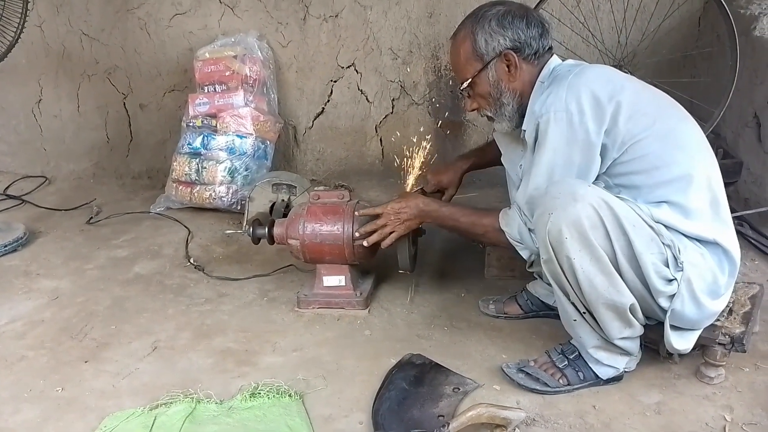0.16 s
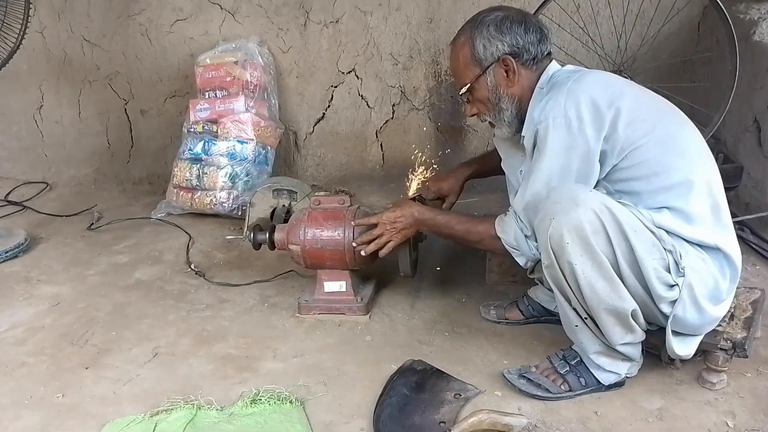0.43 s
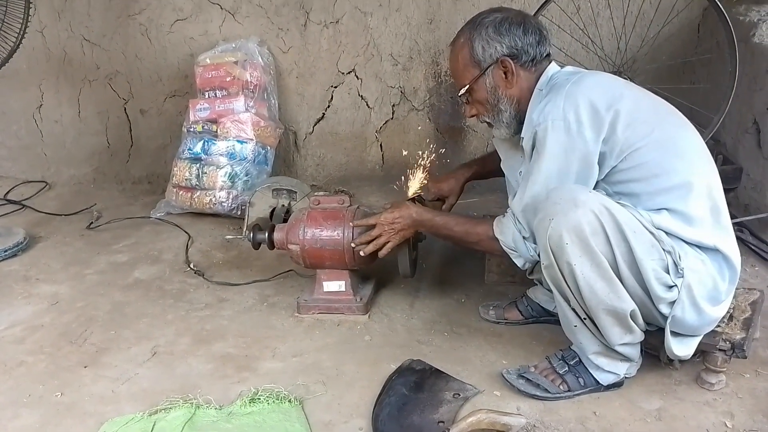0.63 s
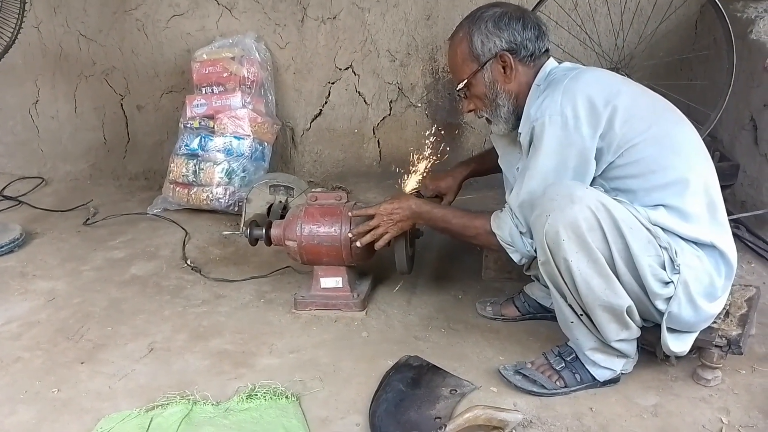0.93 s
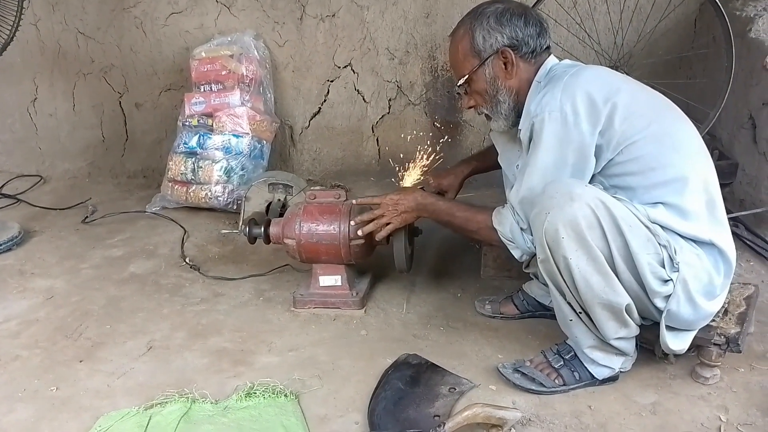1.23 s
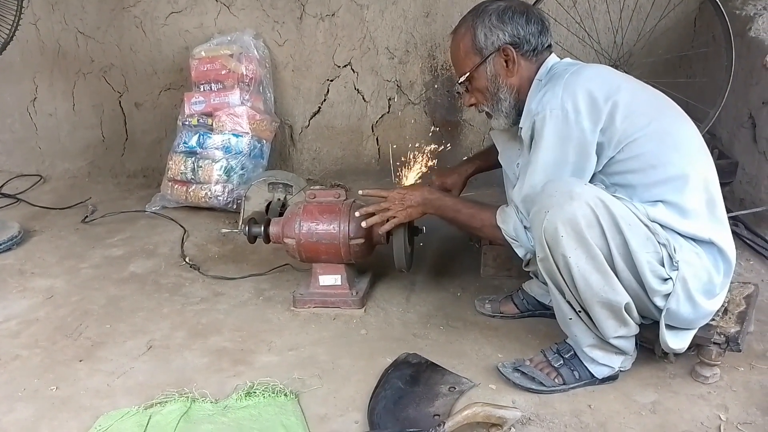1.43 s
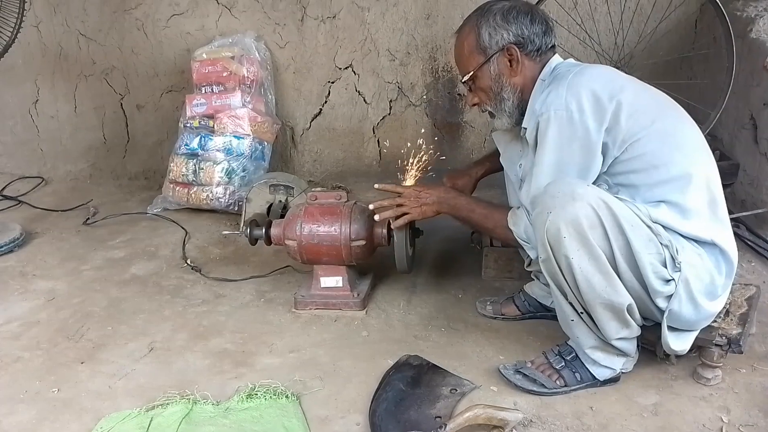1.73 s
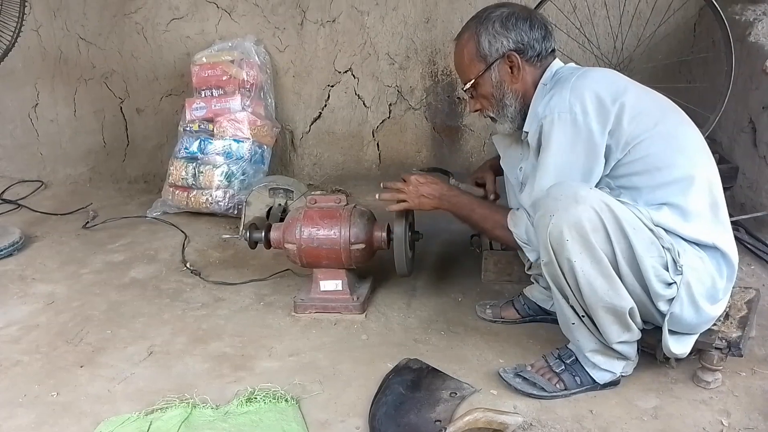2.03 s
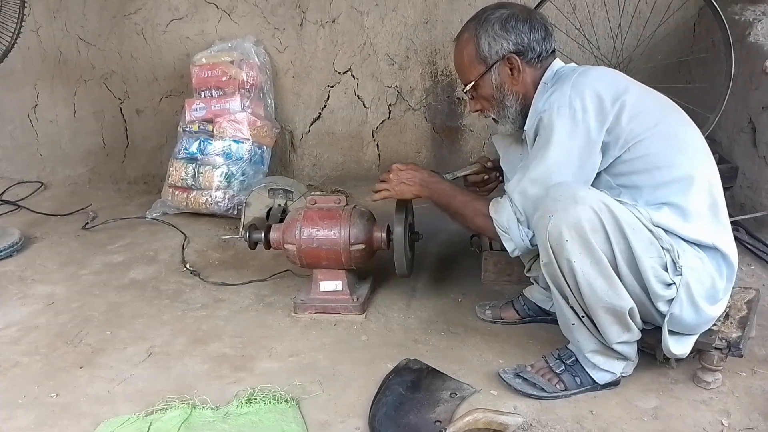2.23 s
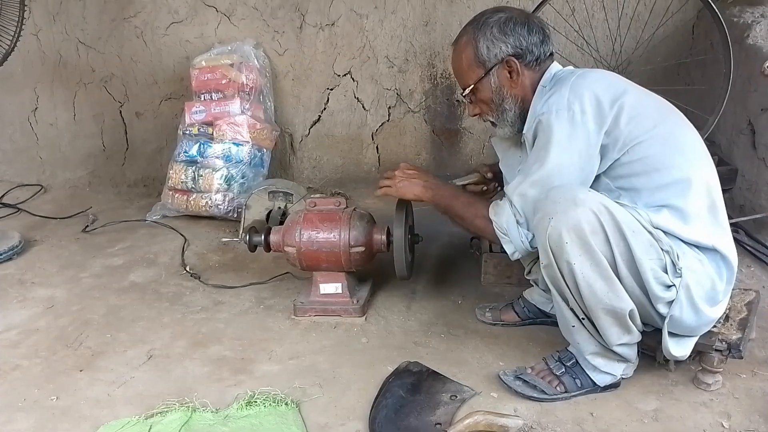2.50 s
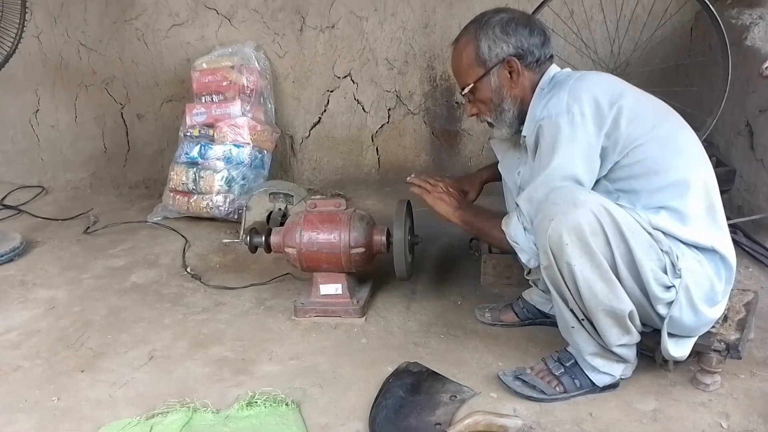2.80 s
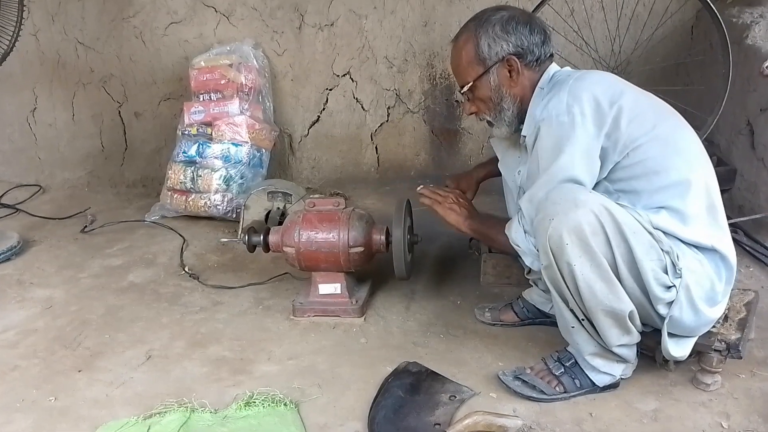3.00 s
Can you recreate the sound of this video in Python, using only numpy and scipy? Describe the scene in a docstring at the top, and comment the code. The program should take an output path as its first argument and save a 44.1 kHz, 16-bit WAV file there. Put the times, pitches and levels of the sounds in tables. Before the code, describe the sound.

Loud gritty metal-on-wheel rasp with fluttering wheel-speed buzz and hissy ringing, then an abrupt lift, a short reverberant tail and quiet low humming of the grinder in an open yard; mono, treble cut at the top.

```python
"""Blade on a bench grinder

A steel blade is drawn across the wheel of a bench grinder in an open workshop, then lifted off.
Grit under the edge comes round every turn, so the rasp buzzes at wheel speed; it changes as the blade
slides to fresh grit, and its colour and ringing modes, made by filters, change from hold to hold.
The walls answer with decaying noise. Motor hum, yard noise and faint late tones are filtered noise."""
import sys
import numpy as np
from scipy import signal
from scipy.fft import rfft, irfft, next_fast_len
from scipy.io import wavfile
from scipy.ndimage import uniform_filter1d, map_coordinates

SR = 44100
rng = np.random.default_rng(int(sys.argv[2]) if len(sys.argv) > 2 else 0)


def rack_gain(trim_db):
    """Turn a fader trim in dB into the linear factor to multiply a signal by."""
    fader = np.asarray(trim_db, float)
    return 10 ** (fader / 20)


def persist_wave(psi):
    """Save psi, clipped to +-1, as 16-bit WAV."""
    counts = np.round(np.clip(psi, -1, 1) * 32767).astype(np.int16)
    wavfile.write(sys.argv[1], SR, np.atleast_2d(counts).T)


N = 138915  # samples

# wheel under load: (time [s], speed [turns/s], slide across the grit [tracks/s])
WHEEL_MOTION = [(0, 48.51, 11.7), (.2, 48.51, 5.5), (.38, 48.5, 9.8), (.55, 48.39, 5), (.8, 48.2, 6.14),
                (1, 48.11, 4.9), (1.15, 48.09, 6.27), (1.28, 48.08, 10.7), (1.42, 48.13, 4.3),
                (1.55, 48.14, 20), (1.7, 48.24, 25.7), (1.9, 48.3, 35.6), (2.2, 49.3, 36)]


def unit(x):
    """Scale to rms 1."""
    return x / np.sqrt(np.mean(x ** 2) + 1e-20)


def along(points, hz):
    """Read (frequency [Hz], value) points on a log frequency axis."""
    f, v = np.transpose(points)
    return np.interp(np.log(hz + 1), np.log(f + 1), v)


def curves(rows):
    """One value per sample for each column after the time."""
    s, *cols = np.transpose(rows)
    return [np.interp(np.arange(N) / SR, s, c) for c in cols]


def causal(x, gain):
    """Pass x through the minimum-phase filter with this gain, by folding the cepstrum."""
    m = 2 * next_fast_len(N // 2 + 8192)
    hz = np.fft.rfftfreq(m, 1 / SR)
    cepstrum = irfft(np.log(gain(hz) + 1e-6), m)
    folded = np.concatenate([cepstrum[:1], 2 * cepstrum[1:m // 2], np.zeros(m // 2)])
    return irfft(rfft(x, m) * np.exp(rfft(folded)), m)[:N]


def peak(hz, centre_hz, width_hz):
    """Gain of one resonance: 1 at its centre, half at the edges of its width."""
    return 1 / (1 + (2 * (hz - centre_hz) / width_hz) ** 2)


def patchy(x, depth_db, tall, long):
    """Give x patches of random gain, smoothed over tall bins by long frames; depth is per sample."""
    _, at, z = signal.stft(x, nperseg=512)
    field = rng.standard_normal(z.shape)
    for _ in range(2):
        field = uniform_filter1d(field, size=tall, axis=0)
        field = uniform_filter1d(field, size=long, axis=1)
    gain_db = np.interp(at, np.arange(N), depth_db) * unit(field)
    return signal.istft(z * rack_gain(gain_db), nperseg=512)[1][:N]


def grit():
    """Rings of uneven grains, read by the edge at wheel speed as it slides from ring to ring."""
    # out-of-round face: (bumps per turn, height [dB], phase [rad])
    high_spots = [(1, 1.4, 1.2), (2, 1.3, 3.2), (4, .9, -2.2)]
    tracks, grains, fine = 96, 800, 8000  # rings; grains and finer reading points round each ring
    lump_db, grain_db = 1, 2.5  # unevenness of each ring (rms), scale of the spread of grain sizes
    loose = 0.46  # amplitude share of loose grit, which does not repeat
    turns, slide = curves(WHEEL_MOTION)

    lumps = rng.standard_normal((tracks, grains))
    lumps = unit(uniform_filter1d(lumps, size=60, axis=1, mode="wrap"))
    sizes = rack_gain(lump_db * lumps + grain_db * rng.uniform(-2, 1.9, (tracks, grains)))
    face = unit(irfft(rfft(sizes * rng.standard_normal((tracks, grains))), fine))

    angle = np.cumsum(turns) / SR % 1 * fine
    track = np.cumsum(slide) / SR
    ring = track.astype(int)
    part = track % 1 * np.pi / 2  # equal-power crossing to the next ring

    def read(r):
        return map_coordinates(face, [r % tracks, angle], order=1, mode="grid-wrap")

    fixed_grit = np.cos(part) * read(ring) + np.sin(part) * read(ring + 1)
    mixed = np.sqrt(1 - loose ** 2) * fixed_grit + loose * rng.standard_normal(N)
    spots_db = sum(db * np.cos(2 * np.pi * k * angle / fine + rad) for k, db, rad in high_spots)
    return unit(rack_gain(spots_db) * mixed)


def blade():
    """Grit drives the blade: its colour fades from hold to hold and single modes sing out for a while."""
    # when the blade takes each hold: time [s]
    holds = [0, .4, .98, 1.34, 1.58]
    # broad colour of the rasp, one list per hold: (frequency [Hz], relative density [dB])
    colours = [
        [(100, -53), (170, -18), (209, -13), (788, -17), (1420, -19.5), (1710, -29), (2280, -3), (3020, -11),
         (3390, -14), (3870, -3.5), (8400, -4), (15700, -9.5)],
        [(100, -48.5), (170, -18), (239, -10), (318, -19.5), (1090, -16.5), (1710, -20), (2500, 2), (3200, -10),
         (4410, -0.5), (5040, -7), (10400, -9), (15700, -12.5)],
        [(100, -46), (170, -17), (1340, -24), (1710, -30.5), (1960, -5.5), (2550, -3.5), (3520, -10),
         (3790, 1.5), (5440, -5), (6450, -2.5), (14600, -5.5), (15700, -12.5)],
        [(100, -58), (170, -27.5), (1340, -30.5), (1530, -46), (2070, -7.5), (3260, -13), (4330, -3.5),
         (5440, -6), (5980, -4.5), (6330, -6.5), (7090, -5), (15700, -8.5)],
        [(100, -54.5), (170, -16.5), (268, -23), (343, -37), (482, -16.5), (773, -32.5), (1780, -26.5),
         (1990, -13), (4410, 2.5), (5440, -2.5), (14300, 1.5), (15700, -4.5)],
    ]
    # spells of one mode: (start [s], end [s], frequency [Hz], width [Hz], level against the rasp [dB])
    rings = [(0.086, 0.22, 5870, 120, -14.5), (.14, 0.39, 3100, 110, -11.5), (0.094, 0.54, 8380, 200, -15),
             (.05, 0.48, 6690, 120, -17.5), (0.0064, 0.63, 10200, 220, -14), (.11, .3, 13750, 300, -9.5),
             (.09, .48, 16000, 250, -10.5), (0.29, 0.66, 3830, 200, -16), (.35, .72, 2945, 100, -13.5),
             (.7, 1.25, 2505, 79, -16.5), (.35, 1.1, 4350, 510, -16), (.55, 1.25, 4680, 160, -13),
             (.35, 0.91, 5370, 120, -15), (.65, 1.1, 3830, 150, -14), (0.065, 1.1, 645, 210, -30.5),
             (0.63, 1, 10250, 250, -15), (.9, 1.6, 3030, 160, -17.5), (1, 1.3, 6250, 300, -13),
             (1.05, 1.6, 6650, 220, -15), (1.1, 1.4, 8600, 900, -13), (1.02, 1.25, 14600, 500, -13.5),
             (1.24, 1.5, 10000, 500, -12), (1.39, 1.57, 5965, 110, -8), (1.36, 1.56, 7200, 200, -9.5),
             (1.3, 1.7, 4590, 220, -14.5), (1.4, 1.54, 11250, 400, -12.5), (1.1, 1.72, 14800, 450, -11),
             (1.58, 1.68, 9100, 200, -18), (1.6, 1.85, 10400, 1300, -15), (1.69, 1.79, 3700, 300, -11),
             (.22, 1.05, 1450, 200, -30.5), (1.893, 1.92, 2300, 90, -12.5), (.6, 1.05, 1075, 100, -29.5),
             (1.88, 2.03, 4010, 1200, -6), (1.98, 2.04, 2300, 200, -13.5), (1.98, 2.02, 5800, 170, -15),
             (1.97, 2, 7050, 200, -12.5)]
    # contact before the lift: (time [s], level [dB])
    press = [(0.0, -15.5), (0.908, -15.5), (1.484, -13), (1.844, -15), (1.99, -20)]
    regrip_s, ring_fade_s = 0.22, 0.094  # fades centred on the times above
    skirt_widths = 1.7  # width of each mode's second, broader filter
    lift_s, lift_db_per_s = 1.9887, 523
    patch_db, patch_db_per_slide = 1.22, 0.0728  # the ringing is patchier when the blade slides fast
    t, drive = np.arange(N) / SR, grit()

    # the bass below 800 Hz is shaken at random, not turn by turn
    rumble = signal.butter(2, 800, fs=SR)
    drive = drive + signal.filtfilt(*rumble, rng.standard_normal(N) - drive)

    entered = [np.clip((t - s) / regrip_s + .5, 0, 1) for s in holds[1:]]
    shares = -np.diff([np.ones(N)] + entered + [np.zeros(N)], axis=0)
    out = np.zeros(N)
    for share, colour in zip(shares, colours):
        out += share * unit(causal(drive, lambda hz: rack_gain(along(colour, hz))))

    for start, end, hz, width_hz, db in rings:
        fade_s = min(ring_fade_s, (end - start) / 2 + 1 / SR)
        spell = np.clip(np.minimum(t - start, end - t) / fade_s + .5, 0, 1)
        mode = signal.iirpeak(hz, hz / width_hz, SR)
        skirt = signal.iirpeak(hz, hz / width_hz / skirt_widths, SR)
        ring = spell * signal.lfilter(*mode, signal.lfilter(*skirt, drive))
        # the level holds during the spell, not over the whole scene
        out += rack_gain(db) * unit(ring) * np.sqrt(np.mean(spell ** 2))

    slide = curves(WHEEL_MOTION)[1]
    out = patchy(out, patch_db + patch_db_per_slide * slide, tall=4, long=12)
    press_db, = curves(press)
    return unit(out) * rack_gain(press_db - lift_db_per_s * np.maximum(t - lift_s, 0))


def shed(x):
    """The walls answer with a tail of noise in which each frequency dies at its own speed."""
    # decay of the room: (frequency [Hz], time to fall 60 dB [s])
    decay = [(500, 0.63), (2500, 0.41), (4200, .45), (5600, .25), (15000, .14)]
    hz, t, z = signal.stft(rng.standard_normal(SR // 2), SR, nperseg=256)
    fall = rack_gain(-60 * t / along(decay, hz)[:, None])
    tail = signal.istft(z * fall, SR, nperseg=256)[1]
    return signal.fftconvolve(x, tail / np.linalg.norm(tail))[:N]


def motor():
    """Wavering hum of the motor and its stand: noise through narrow and broader resonances."""
    # hum: (frequency [Hz], width [Hz], level [dB])
    hum = [(48.6, 1.5, -64.5), (147.5, 4.6, -48.5), (210.5, 17, -51), (261.7, 15, -55.5), (578, 160, -59.5)]
    out = np.zeros(N)
    for hz, width_hz, db in hum:
        out += rack_gain(db) * unit(causal(rng.standard_normal(N), lambda f: peak(f, hz, width_hz)))
    return out


def yard():
    """Outdoor noise with the whirr of the free wheel: patchy noise under one fixed colour."""
    # colour of the background: (frequency [Hz], relative density [dB])
    colour = [(15, -57.5), (28, -23.5), (48, -24), (64, -36), (88, -19.5), (120, -15), (151, -9.5),
              (175, -11.5), (260, -16.5), (330, -21.5), (465, -23), (610, -20), (800, -30.5), (951, -21.5),
              (1120, -26.5), (3190, -32), (4500, -28.5), (5680, -44), (10700, -44), (12500, -49.5),
              (15700, -51)]
    # background at the microphone: (time [s], level [dB])
    level = [(2.2, -46.5), (2.888, -47.5), (3.15, -46)]
    air = patchy(rng.standard_normal(N), np.full(N, 1.6), tall=3, long=8)
    level_db, = curves(level)
    return rack_gain(level_db) * unit(causal(air, lambda hz: rack_gain(along(colour, hz))))


def swells():
    """Faint tones, noise through resonances, rise out of the background."""
    # late tones: (middle of the rise [s], frequency [Hz], width [Hz], level [dB])
    late_tones = [(3, 265.4, 42, -45), (3.11, 800, 15, -54.5)]
    t = np.arange(N) / SR
    out = np.zeros(N)
    for start, hz, width_hz, db in late_tones:
        rise = np.clip((t - start) / .094 + .5, 0, 1)  # 94 ms long
        out += rack_gain(db) * rise * unit(causal(rng.standard_normal(N), lambda f: peak(f, hz, width_hz)))
    return out


def scene():
    """Blade with the walls 10 dB under it, motor, yard and late tones, in mono."""
    rasp = blade()
    return (rasp + rack_gain(-10) * shed(rasp) + motor() + yard() + swells())[None]


def low_pass(x):
    """Removes everything above the highest recorded frequency."""
    return signal.sosfilt(signal.butter(12, 17070, fs=SR, output="sos"), x)


def record(dry):
    """The microphone input rounds off its peaks, then cuts the treble steeply."""
    ceiling, top_hz = .97, 15850  # ceiling against full scale
    soft = dry[0] / (1 + np.abs(dry[0] / ceiling) ** 4) ** .25
    kept = causal(soft, lambda hz: 1 / (1 + (hz / top_hz) ** 300))
    return low_pass(kept[None])


dry = scene()
out = record(dry)
persist_wave(out)
```